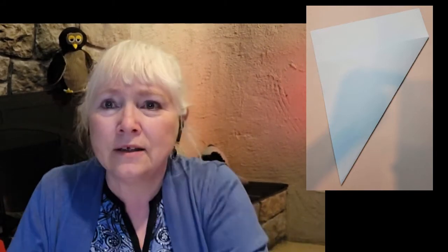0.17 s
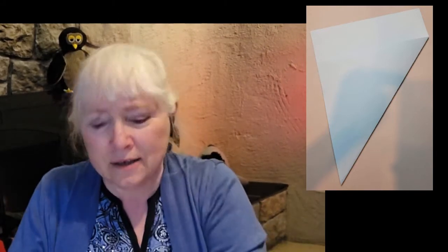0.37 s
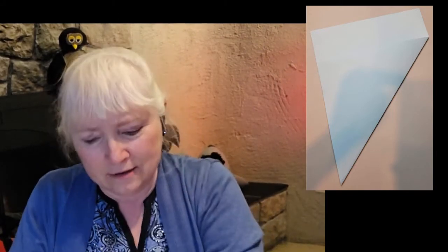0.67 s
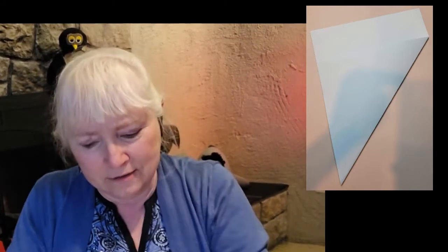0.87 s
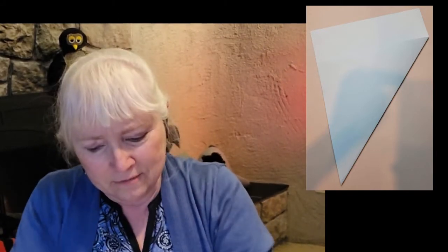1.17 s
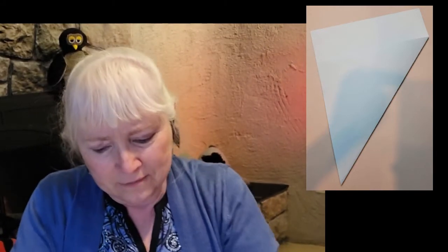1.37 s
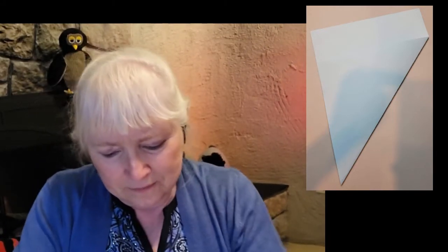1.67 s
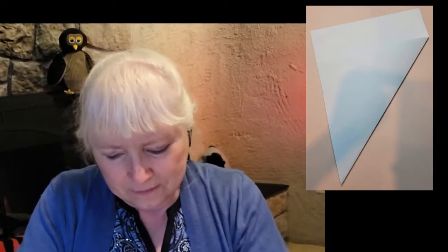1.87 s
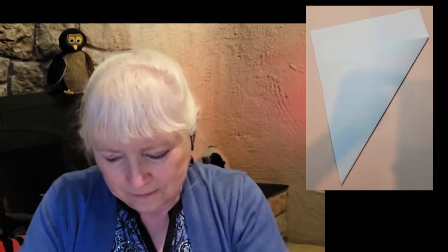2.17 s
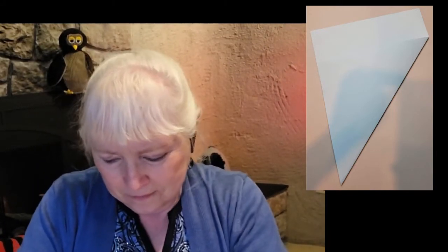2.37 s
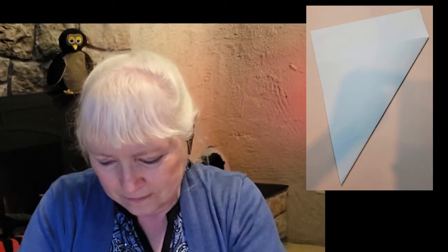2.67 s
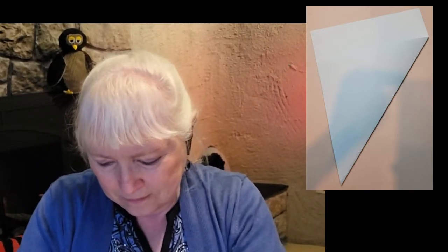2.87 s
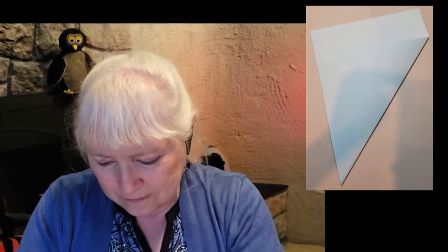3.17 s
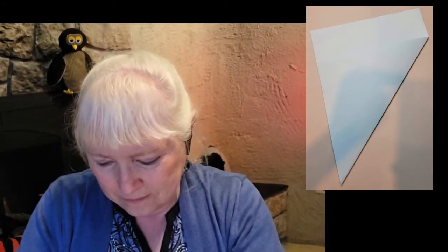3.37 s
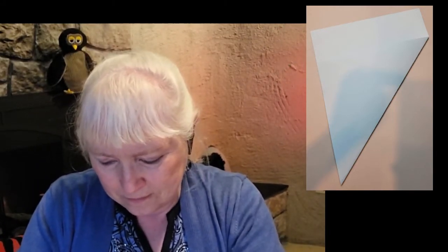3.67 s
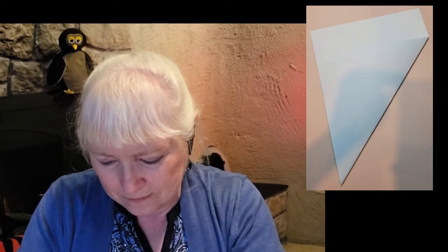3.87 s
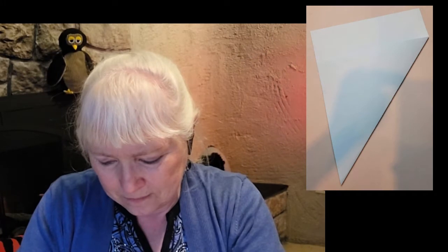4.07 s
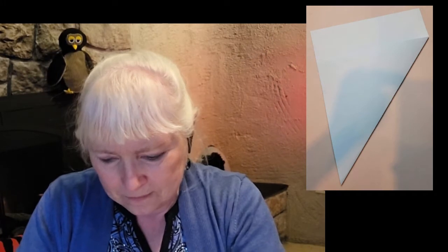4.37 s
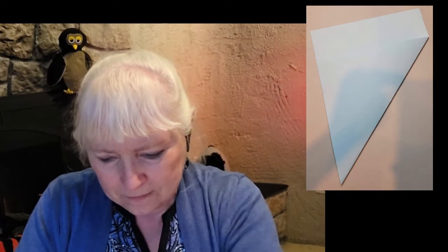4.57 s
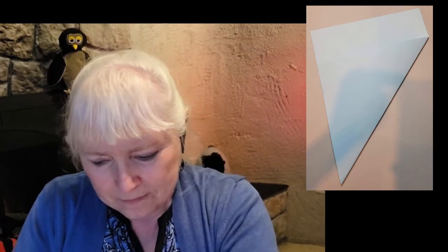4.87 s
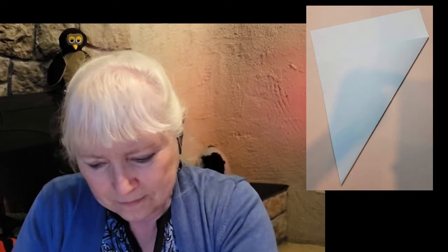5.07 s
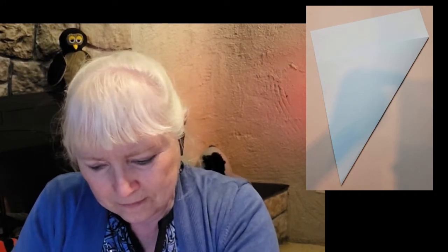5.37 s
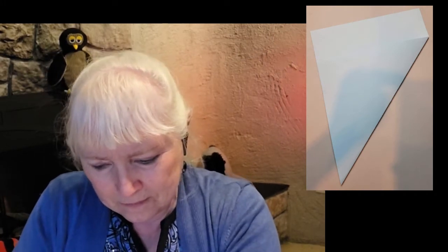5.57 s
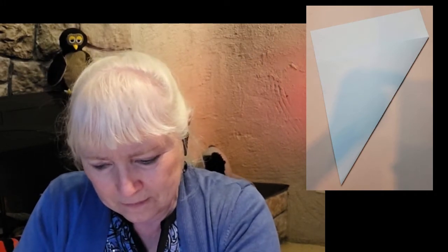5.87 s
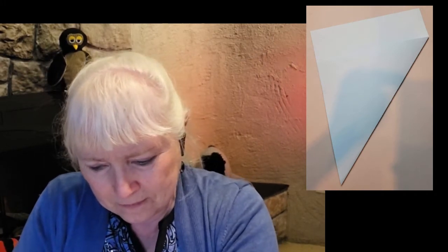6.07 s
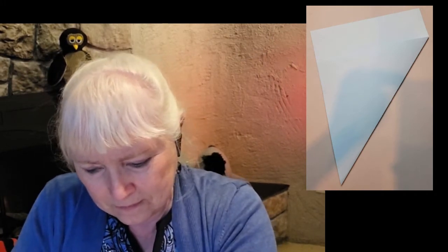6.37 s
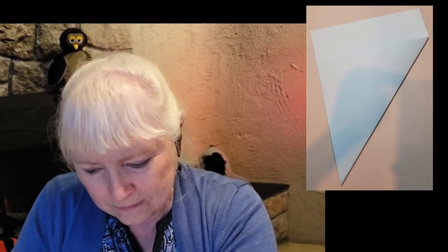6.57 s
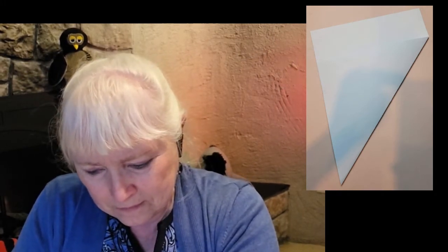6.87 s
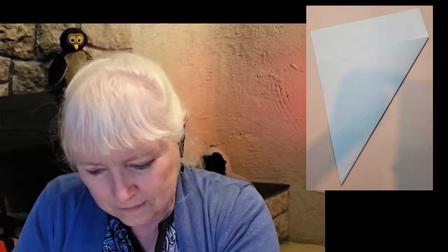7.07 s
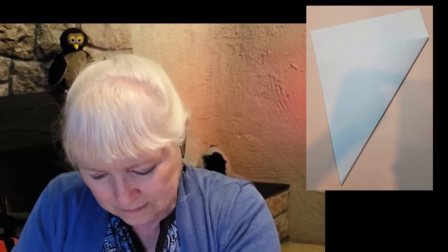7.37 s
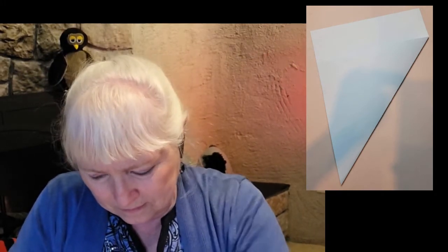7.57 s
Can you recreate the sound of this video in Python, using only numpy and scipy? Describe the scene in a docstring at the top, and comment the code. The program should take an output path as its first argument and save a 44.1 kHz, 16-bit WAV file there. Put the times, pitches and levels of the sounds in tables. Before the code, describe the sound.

Hands fold paper at a table: sharp crackling buckles at once, a lull with soft thumps, another rustle with small snaps, a pause, then the strongest swish and pops past the middle. Quiet rubbing follows, and a small clinking touch precedes the final swish and snap. The close stereo microphone also catches faint hum, thin whine, steady hiss and a short room echo.

```python
"""A sheet of paper is folded by hand on a table in a quiet, slightly live room.
A low hum, faint whines and an even hiss lie underneath throughout, all made of sines and filtered noise.
In the first half second the sheet buckles with loud snaps: short noise bursts that ring at a panel's pitch.
Then come hissing slides, crackling and soft thuds, with more snaps near 2 and 4.5 s and a few faint squeaks.
Gentler strokes follow, then a small bright tinkle near 7.1 s and the last thuds and snaps."""
import sys
import numpy as np
from scipy import signal
from scipy.fft import rfft, irfft, next_fast_len
from scipy.io import wavfile
from scipy.ndimage import uniform_filter1d

SR = 44100
rng = np.random.default_rng(int(sys.argv[2]) if len(sys.argv) > 2 else 0)


def generate_wav(signal):
    """Clip the signal to [-1, 1] and save it as 16-bit WAV at the path in sys.argv[1]."""
    frames = np.transpose(np.atleast_2d(signal))
    scaled = np.clip(frames, -1, 1) * 32767
    pcm = np.round(scaled).astype(np.int16)
    wavfile.write(sys.argv[1], SR, pcm)


N = 340382
TIME = np.arange(N) / SR


def from_db(db):
    """Turn decibels into a plain factor."""
    return 10 ** (np.asarray(db) / 20)


def rms_one(x):
    """Scale a sound to an average (RMS) strength of 1."""
    return x / np.sqrt(np.mean(x ** 2) + 1e-20)


def at_hz(points, hz):
    """Read a table of (Hz, value) at any frequency, on a log-frequency axis."""
    f, value = np.transpose(points)
    return np.interp(np.log(np.maximum(hz, 1)), np.log(f), value)


def add(track, s, sound):
    """Mix a sound into a track from a given time in seconds on."""
    start = int(s * SR)
    track[..., start:start + sound.shape[-1]] += sound[..., :N - start]


def colour(x, points):
    """Filter with the given (Hz, dB) shape, reacting as early as possible (minimum phase)."""
    size = 2 * next_fast_len(x.shape[-1] // 2 + 1)
    gain_db = at_hz(points, np.fft.rfftfreq(size, 1 / SR))
    # folding the cepstrum forward in time keeps the filter from sounding before its input
    cepstrum = irfft(np.log(from_db(gain_db)))
    cepstrum[1:size // 2] *= 2
    cepstrum[size // 2 + 1:] = 0
    filtered = irfft(rfft(x, size) * np.exp(rfft(cepstrum)))
    return filtered[..., :x.shape[-1]]


def resonance(x, hz, width):
    """Two-pole resonance with gain 1 on top; a narrower width in Hz rings longer."""
    r = np.exp(-np.pi * width / SR)
    feed = (1 - r * r) / 2 * np.array([1, 0, -1])
    feedback = [1, -2 * r * np.cos(2 * np.pi * hz / SR), r * r]
    return signal.lfilter(feed, feedback, x)


def drift(per_s):
    """Random wander: `per_s` new random values a second (spread 1), joined by straight lines."""
    knots = rng.standard_normal(N // 20)
    return np.interp(TIME * per_s, np.arange(len(knots)), knots)


def stereo_noise(size=N, likeness=None, left_lag=0.0):
    """Noise for two microphones, shared in part, with the left one lagging by `left_lag` samples."""
    # How alike left and right are. Each row: frequency in Hz, likeness from -1 to 1.
    usual_likeness = [(100, 1), (300, 0.74), (700, 0.67), (1400, -0.31), (2800, 0.18), (5000, 0.42),
                      (14000, -0.21)]
    # Loudness of left against right. Each row: frequency in Hz, left minus right in dB.
    balance = [(130, .5), (500, -3.5), (1100, -1.55), (2200, -4), (4200, -0.6), (8000, -4.5), (13000, 0.5)]
    padded = 2 * next_fast_len(size // 2 + 1)
    hz = np.fft.rfftfreq(padded, 1 / SR)
    mid, side = rfft(rng.standard_normal((2, padded)))
    alike = np.clip(at_hz(usual_likeness if likeness is None else likeness, hz), -1, 1)
    signs = np.array([[1], [-1]])   # left, right
    pair = np.sqrt(1 + alike) * mid + np.sqrt(1 - alike) * side * signs
    pair = pair * from_db(signs * at_hz(balance, hz) / 2)
    pair[0] *= np.exp(-2j * np.pi * hz * left_lag / SR)
    return rms_one(irfft(pair)[:, :size])


def paper_noise(size=N):
    """Noise from the sheet, which lies a little to the right, so the left side lags."""
    # How alike left and right are for the sheet. Each row: frequency in Hz, likeness from -1 to 1.
    paper_likeness = [(100, .93), (700, 0.64), (1300, 0.74), (2500, .8), (4500, 0.22), (8000, 0.12),
                      (14000, .3)]
    return stereo_noise(size=size, likeness=paper_likeness, left_lag=3.2)


def evened(burst):
    """A short burst with its energy spread evenly over frequency."""
    power = uniform_filter1d(np.mean(np.abs(rfft(burst)) ** 2, axis=0), size=64)
    hz = np.fft.rfftfreq(burst.shape[-1], 1 / SR)
    opposite_db = -10 * np.log10(power + 1e-20)
    return colour(burst, np.column_stack([hz, opposite_db])[1:])   # leaves out 0 Hz


def gesture(rise, length, t60, sag_db_per_s=0):
    """Envelope of one movement: a smooth rise, a sagging hold until `length`, then a fade."""
    t = TIME[:SR]
    swell = np.sin(np.pi / 2 * np.minimum(t / max(rise, 1e-3), 1)) ** 2
    sag_db = sag_db_per_s * np.maximum(t - rise, 0)
    fade_db = 60 * np.maximum(t - length, 0) / t60
    return swell * from_db(-sag_db - fade_db)


def microphone_hiss(level_db=-73.5):
    """Steady filtered noise: the microphone's even hiss fills the pauses."""
    # Tone of the hiss. Each row: frequency in Hz, gain in dB.
    mic_colour = [(200, -2.5), (900, 8), (1800, 8.5), (3300, 2.5), (5000, -1.5), (8000, 0), (11000, 0.5),
                  (15500, -3)]
    return from_db(level_db) * rms_one(colour(stereo_noise(), mic_colour))


def room_tone(level_db=-59.5, waver_db=3.0):
    """Steady rumble, the wavering hum of mains and a small fan, and its faint whine."""
    # Tone of the rumble. Each row: frequency in Hz, gain in dB.
    rumble_colour = [(25, 0.5), (60, 3), (130, 5), (180, 0), (280, -1), (480, -10.5), (750, -27.5),
                     (1100, -48), (1800, -21.5), (2400, -19), (3200, -43), (5600, -35), (7800, -33.5),
                     (9000, -39.5), (11000, -41), (16000, -42)]
    # Pure tones of the hum. Each row: frequency in Hz, middle level in dB.
    hum_lines = [(59, -68.5), (119, -65.5), (275, -71.5), (360, -73), (523, -75.5), (786, -87.5),
                 (1048, -88), (1309, -83.5)]
    # Bands of noise. Each row: frequency in Hz, resonance width in Hz, level in dB.
    whine_bands = [(1259, 150, -79), (2470, 20, -82), (2560, 72, -76.5), (7900, 900, -86)]
    rumble = from_db(level_db) * rms_one(colour(stereo_noise(), rumble_colour))
    hum = 0
    for hz, db in hum_lines:
        strength = from_db(db + waver_db * drift(6.5)) * np.sqrt(2)
        phase = 2 * np.pi * hz * TIME + .5 * drift(2.6)
        hum = hum + strength * np.sin(phase)
    air, whine = stereo_noise(), 0
    for hz, width, db in whine_bands:
        # resonating twice makes the skirts steeper
        band = resonance(resonance(air, hz, width), hz, width)
        whine = whine + from_db(db) * rms_one(band)
    return rumble + hum + whine


def room(x, build_up=0.002):
    """Diffuse reflections of the right channel build up in `build_up` s and die octave by octave."""
    # How long the echo lasts. Each row: frequency in Hz, time to fall by 60 dB in seconds.
    echo_t60 = [(125, 1), (300, 0.96), (1000, 0.43), (2500, 0.29), (5000, 0.23), (12000, 0.24)]
    # How strong the echo is. Each row: frequency in Hz, gain in dB.
    echo_gain = [(125, 0), (300, 3.5), (900, -8.5), (2500, -8), (6000, -12), (12000, -12)]
    t, response = TIME[:SR], 0
    edges = 62.5 * 2.0 ** np.arange(9)   # octave borders in Hz
    for low, high in zip(edges, edges[1:]):
        hz = np.sqrt(low * high)
        octave = signal.butter(3, [low, high], "band", fs=SR, output="sos")
        band = signal.sosfilt(octave, stereo_noise(size=SR))
        tail = band * from_db(-60 * t / at_hz(echo_t60, hz)) * (1 - np.exp(-t / build_up))
        # a wider octave holds more energy
        share = np.sqrt(2 * (high - low)) / SR
        response = response + from_db(at_hz(echo_gain, hz)) * rms_one(tail) * share
    return signal.fftconvolve(x[1:], response, axes=1)[:, :N]


def tinkle(width=150, rattle_db=-1.0, rattle_t60=0.36):
    """Something small and bright is touched and rings briefly over a fine rattle."""
    # The touches. Each row: start in seconds, level in dB applied to ring and rattle together.
    touches = [(7.099, -51.5), (7.127, -56.5)]
    # The ringing tones. Each row: frequency in Hz, starting level in dB, time to fall by 60 dB in seconds.
    ring_modes = [(1765, -9, 0.59), (3350, -22.5, 0.35), (4360, -11, 0.32), (5880, -12, .25),
                  (6300, -6.5, 0.15), (10450, -1, 0.12), (10300, -13.5, 0.25), (14500, -13, .15)]
    rattle_colour = [(1500, -5.0), (3500, 0.5), (7000, -3.5), (15000, -3.5)]   # Hz, dB
    out, t = np.zeros((2, N)), TIME[:SR // 2]
    for s, db in touches:
        touch = stereo_noise(size=len(t))
        rings = 0
        for hz, mode_db, t60 in ring_modes:
            rings = rings + rms_one(resonance(touch, hz, width)) * from_db(mode_db - 60 * t / t60)
        rattle = rms_one(colour(touch, rattle_colour)) * from_db(rattle_db - 60 * t / rattle_t60)
        add(out, s, from_db(db) * (rings + rattle))
    return out


def hollow(modes, outline, size):
    """Low resonances stirred by a soft push that holds its strength over `size` samples."""
    push, body = paper_noise(), 0
    for k, (hz, width, db) in enumerate(modes):
        # neighbouring resonances move in opposite directions
        body = body + (-1) ** k * from_db(db) * resonance(push, hz, width)
    body = colour(body, outline)
    return body / np.sqrt(uniform_filter1d(np.mean(body ** 2, axis=0), size=size))


def press_levels(rub_db):
    """Strength of boom and flap over time: the presses, on top of restless arms and rubbing fingers."""
    # The sheet is flapped over and pressed down.
    # Each row: start in seconds, flap's swell time in seconds, table boom in dB, flap in dB.
    presses = [(0, 0.0027, -48, -45), (.08, 0.018, -56.5, -47), (.32, 0.05, -44.5, -34.5),
               (.38, 0.015, -42, -42), (0.569, 0.032, -51.5, -45.5), (.79, .03, -51.5, -57.5),
               (1.06, 0.032, -36, -39), (1.729, 0.018, -37, -31.5), (2.13, 0.033, -47, -43.5),
               (2.58, 0.013, -49, -58), (2.804, 0.043, -36, -35), (3.41, .03, -52.5, -84),
               (4.12, 0.075, -44.5, -61), (4.274, 0.033, -35.5, -30), (4.359, .022, -35.5, -27),
               (4.58, 0.014, -43, -38), (4.635, 0.019, -51, -39), (5.369, 0.016, -51, -77.5),
               (5.572, 0.027, -52, -62), (5.92, .06, -54, -59.5), (7.04, 0.036, -47, -52),
               (7.365, 0.012, -51, -43.5), (7.5, 0.023, -56, -46), (7.568, 0.027, -43, -38)]
    boom_slower = 1.8   # the flap of air comes first; the table answers more slowly
    boom_t60, flap_t60 = .45, .45   # s
    # the arms never quite rest: their level wavers, with 9 new random values a second
    restless_db = 0.5 * drift(9)
    # rubbing stirs table and sheet too; separate causes add in power
    boom = from_db(-62.5 + restless_db) ** 2 + from_db(rub_db - 10) ** 2
    flap = from_db(-64.5 + restless_db) ** 2 + from_db(rub_db - 7) ** 2
    for s, rise, boom_db, flap_db in presses:
        boom_rise = boom_slower * rise
        add(boom, s, (from_db(boom_db) * gesture(boom_rise, boom_rise, boom_t60)) ** 2)
        add(flap, s, (from_db(flap_db) * gesture(rise, rise, flap_t60)) ** 2)
    return np.sqrt(boom), np.sqrt(flap)


def thuds(rub_db):
    """The table booms under the hands; the flapping sheet pushes air out from beneath it."""
    # Hollow of the table. Each row: frequency in Hz, width in Hz, gain in dB before the outline filter.
    table_modes = [(60.4, 29, -12.5), (85, 25, -14), (121.5, 5.4, 3.5)]
    # Air under the sheet. Each row: frequency in Hz, width in Hz, gain in dB before the outline filter.
    air_modes = [(248, 36, 0), (309.3, 36.8, 1), (361, 90, -5.5), (516, 150, -15), (630, 68, -16)]
    boom_outline = [(20, -0.5), (135, -4), (200, -7.0), (700, -44)]   # Hz, dB
    flap_outline = [(90, -17.5), (200, -3), (700, -2), (1100, -13.0), (4000, -51)]   # Hz, dB
    boom_strength, flap_strength = press_levels(rub_db)
    boom = hollow(table_modes, boom_outline, size=2600)
    flap = hollow(air_modes, flap_outline, size=1500)
    return boom_strength * boom + flap_strength * flap


def stroke_levels():
    """Levels in dB of rub, swish and hiss over time; overlapping strokes add in power."""
    # Strokes of hand and sheet. Each row: start in seconds, speeding-up time in seconds,
    # length in seconds, fingertip rub in dB, sheet swish in dB, hiss on the table in dB.
    strokes = [(0, 0.001, 0.031, -41.5, -37.5, -48.5), (0.035, 0.032, 0.16, -48.5, -46, -50.5),
               (0.24, 0.24, 0.18, -41, -32.5, -39), (0.527, 0.073, 0.08, -46.5, -52, -54),
               (0.621, 0.062, 0.19, -65.5, -58.5, -55), (1.043, 0.054, 0.083, -58.5, -50.5, -54.5),
               (1.123, .05, 0.21, -62, -59, -59.5), (1.727, 0.021, 0.18, -43.5, -45, -49.5),
               (1.922, 0.083, 0.15, -44, -46, -52.5), (2.085, 0.049, 0.09, -43, -41.5, -45.5),
               (2.158, 0.022, .2, -49.5, -44.5, -49.5), (2.366, 0.031, 0.14, -53.5, -52.5, -59),
               (2.56, 0.047, 0.16, -70, -66, -71.5), (2.734, 0.048, 0.048, -58, -54, -51.5),
               (2.814, .03, 0.11, -59, -56.5, -66), (2.966, 0.05, 0.085, -51.5, -52, -60),
               (3.297, 0.074, 0.1, -58, -55.5, -61), (3.532, 0.076, 0.098, -54.5, -53.5, -57.5),
               (4.195, 0.17, 0.13, -39, -38, -44), (4.354, 0.093, 0.21, -52, -43, -42.5),
               (4.558, 0.056, 0.16, -55, -36.5, -40), (4.817, 0.08, 0.13, -63, -57, -60),
               (4.953, 0.098, 0.48, -64, -60, -64), (5.165, 0.059, 0.15, -61, -57, -65.5),
               (5.727, 0.065, 0.29, -72.5, -60, -65.5), (6.076, 0.18, .29, -75, -56.5, -67.5),
               (6.689, 0.095, 0.12, -67.5, -61.5, -64), (7.344, 0.06, 0.3, -53, -48, -53),
               (7.426, .15, 0.27, -51, -41.5, -43)]
    power = np.zeros((3, N))
    for s, rise, length, *levels_db in strokes:
        # a stroke tires as it goes, then runs out; a long one runs out more slowly
        run_out_t60 = .15 + 1.22 * length
        speed = gesture(rise, length, run_out_t60, sag_db_per_s=10.5)
        add(power, s, np.outer(from_db(levels_db), speed) ** 2)
    return 10 * np.log10(power + 1e-12)


def friction(spectrum, level_db, grain_db):
    """Fibres catch and let go: noise with a fine grain and a slight unevenness of the stroke."""
    stutter_db = .8 * drift(60) + 1.2 * drift(250)
    grip = from_db(grain_db * drift(900) + stutter_db)
    # close the spectrum an octave below its lowest point
    closed = [(spectrum[0][0] / 2, -60)] + list(spectrum)
    return from_db(level_db) * rms_one(colour(paper_noise() * grip, closed))


def sliding(rub_db, swish_db, hiss_db):
    """Fingertips rub dully, the sheet swishes, and its face hisses over the table."""
    # Tones of the three kinds of friction. Each row: frequency in Hz, gain in dB.
    rub_colour = [(450, -28), (700, -7), (950, -3.5), (1300, 1), (1700, -6), (2600, -30)]
    swish_colour = [(900, -52.5), (1500, -9.5), (1900, -3), (2400, -2), (3000, -5), (3600, -4.5),
                    (4200, -4.5), (5000, -4.5), (6200, -10.5), (7500, -14), (8700, -22.5), (16000, -26.5)]
    hiss_colour = [(2000, -9), (4500, -4.5), (7400, 2), (8700, -6.5), (10800, 2), (12000, 0.5), (14000, -1),
                   (16000, -6)]
    rub = friction(rub_colour, rub_db, grain_db=-2.5)
    swish = friction(swish_colour, swish_db, grain_db=1.0)
    hiss = friction(hiss_colour, hiss_db, grain_db=0.5)
    return rub + swish + hiss


def squeaks():
    """A dragging fingertip squeaks or rubs: a noise band, narrow at first and broad later, swells and fades."""
    # Each row: middle in seconds, spread in time in seconds, pitch in Hz, resonance width in Hz, level in dB.
    finger_drags = [(1.264, 0.092, 1447, 191.3, -64.5), (5.262, 0.066, 1790, 807, -56.5),
                    (6.29, 0.058, 2270, 695, -65.5)]
    out, drag = 0, paper_noise()
    for s, length, hz, width, db in finger_drags:
        swell = np.exp(-.5 * ((TIME - s) / length) ** 2)
        band = resonance(resonance(drag, hz, width), hz, width)
        out = out + from_db(db) * swell * rms_one(band)
    return out


def crackle(force_db, per_s=90):
    """Where the fingers press the fold, single fibres give way with tiny ticks, up to about `per_s` a second."""
    # Tone of a tick. Each row: frequency in Hz, gain in dB.
    tick_colour = [(300, -20.5), (750, -13), (1050, 1.5), (1600, -7), (2400, -4.5), (4500, -10.5),
                   (8500, -26), (16000, -22)]
    # only a firm press breaks fibres: none below -56 dB, the full rate from -48 dB
    firmness = np.clip((force_db + 56) / 8, 0, 1)
    breaks = rng.random(N) < per_s / SR * firmness
    # each tick dies away within a few milliseconds; the tiny offset avoids exact zeros
    ticks = signal.lfilter([1], [1, -np.exp(-1 / (.0005 * SR))], breaks + 1e-18)
    return from_db(8.0) * colour(paper_noise() * ticks * from_db(force_db), tick_colour)


def snaps(grain_db=2.5, panel_db=9.0, dip_db=0.5, kink=0.22, kink_s=0.00027):
    """Each buckle is an avalanche of tiny fibre slips that swells and dies within milliseconds."""
    # Each row: start in seconds, level in dB (9.5 dB is taken off below), swell time in seconds,
    # panel pitch in Hz (the ring peaks at 0.77 to 0.94 of it), bass in dB, crack in dB before offsets.
    buckle_events = [(0.0879, -36, 0.0023, 1170, 6, -19), (0.1425, -35.5, .0048, 1780, 6, -9.5),
                     (0.3192, -21, 0.0016, 1540, 0, -13), (0.3573, -20.5, 0.0031, 1260, 8.5, -24),
                     (0.39, -17.5, 0.0056, 1740, 3, -11), (0.4322, -24, 0.0081, 1320, -4, -19),
                     (0.4517, -14, 0.0026, 1770, -5.5, -9), (1.0584, -48, .0018, 1507, 29, -0.5),
                     (1.7354, -41.5, .0022, 1280, -4.5, -1.5), (1.739, -22.5, 0.0092, 1650, 5, -8.5),
                     (1.8461, -36, 0.0027, 1135, 11, -14.5), (1.8956, -37, .0013, 1120, 8, -16),
                     (1.952, -33.5, 0.0016, 1040, -8, -31), (1.9603, -36, .0013, 1360, 7, -10.5),
                     (1.9949, -35, 0.0011, 1190, -5, -14), (2.0088, -30.5, 0.0031, 1300, 0.5, -25),
                     (2.0635, -27, 0.0017, 1060, -9, -27.5), (2.116, -41, 0.0017, 1040, -1, -18),
                     (2.136, -33.5, .0035, 1350, -14, -14), (2.1896, -34.5, 0.0017, 1240, -4, -19),
                     (2.4491, -36.5, 0.0032, 1520, -7, -4.5), (2.808, -26.5, 0.0021, 1520, -7.5, -20.5),
                     (4.232, -52.5, .0025, 1152, 4, -14), (4.307, -29, 0.0017, 1380, 7, -20),
                     (4.3145, -18, 0.0015, 1400, -17.5, -18.5), (4.498, -40.5, .0027, 1504, -2, -12),
                     (4.5857, -14.5, 0.00078, 2020, -2.5, -10.5), (4.6033, -41, 0.00052, 2340, 1, -12),
                     (4.651, -20.5, .0015, 1850, -0.5, -6.5), (4.7025, -23, 0.001, 1868, -13.5, -4),
                     (7.059, -56, 0.001, 1570, -10, -33), (7.3712, -36.5, 0.0026, 1866, 7, -16),
                     (7.542, -25.5, 0.0042, 1680, -4.5, -19)]
    # Common tone of all snaps. Each row: frequency in Hz, gain in dB.
    snap_colour = [(60, -19.5), (160, -13), (270, -7), (450, -4), (660, -1), (820, -3), (1000, 2),
                   (1250, -3.5), (2000, 0.5), (2900, -0.5), (3700, 2.5), (5200, 1), (8700, -5),
                   (16000, -10)]
    out, t = np.zeros((2, N)), TIME[:SR // 8]
    for s, db, swell, panel_hz, bass_db, crack_db in buckle_events:
        # top-octave sizzle follows the crack, and is weaker the bigger the snap (-29.5 dB is middling)
        sizzle_db = crack_db - 11.5 - 0.72 * (db + 29.5)
        age = t / max(swell, 1e-4)
        # slips come in clumps of 8 samples
        clumps = np.repeat(rng.standard_normal(len(t)), 8)[:len(t)]
        slips = paper_noise(size=len(t)) * from_db(grain_db * clumps)
        # a first kink gives way at once, then the avalanche follows
        surge = age * np.exp(-age) + kink * np.exp(-t / kink_s)
        burst = colour(evened(slips * surge), snap_colour)
        # the panel that flips over rings broadly at a pitch set by its size,
        # and radiates poorly just below it
        burst = colour(burst, [(panel_hz * 0.11, 0), (panel_hz * 0.47, -dip_db),
                               (panel_hz * 0.77, panel_db), (panel_hz * 0.94, panel_db), (panel_hz * 2, 0)])
        # large panels give bass, tight kinks give crack and sizzle
        burst = colour(burst, [(550, bass_db), (1000, 0), (1900, 0.0049), (3000, crack_db + 10),
                               (5000, crack_db + 5.5), (8500, sizzle_db + 11.0)])
        add(out, s, from_db(db - 9.5) * rms_one(burst))
    return out


def scene(slide_wet_db=-1.5):
    """The paper sounds ring on in the room, above the thuds and the room tone."""
    rub_db, swish_db, hiss_db = stroke_levels()
    background = room_tone() + microphone_hiss() + tinkle()
    slides = sliding(rub_db, swish_db, hiss_db) + squeaks()
    buckles = snaps() + crackle((rub_db + swish_db) / 2)
    echo = room(buckles + from_db(slide_wet_db) * slides)
    return background + thuds(rub_db) + slides + buckles + echo


def record(dry):
    """The highest peaks are rounded and the top is cut steeply above 16050 Hz."""
    rounded = np.tanh(dry / 1.1) * 1.1
    top_cut = signal.ellip(12, .1, 80, 16050, fs=SR, output="sos")
    return signal.sosfilt(top_cut, rounded)


dry = scene()
out = record(dry)
generate_wav(out)
```